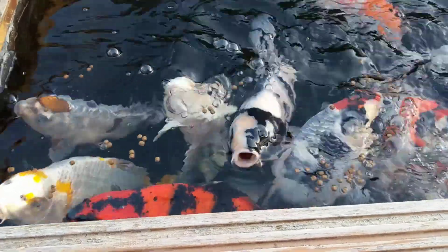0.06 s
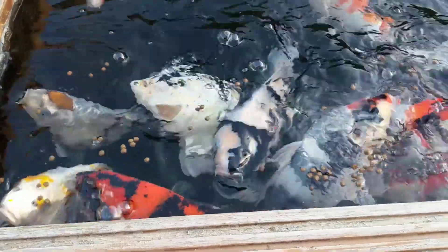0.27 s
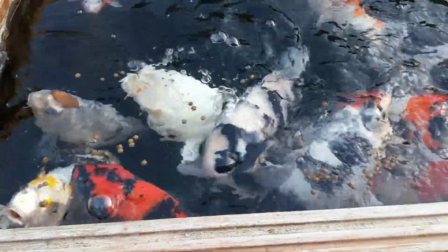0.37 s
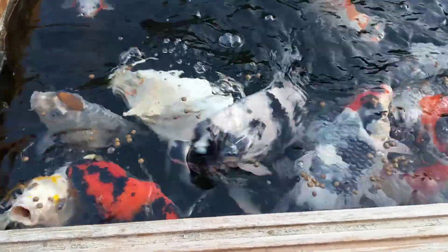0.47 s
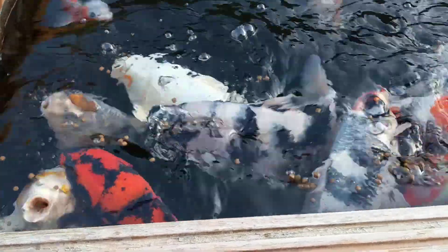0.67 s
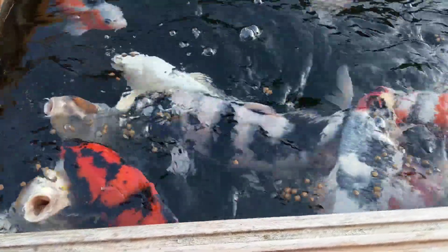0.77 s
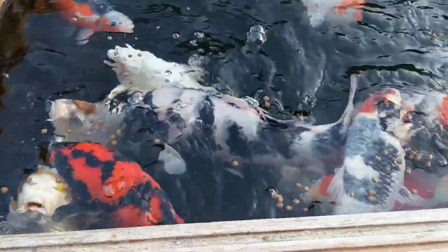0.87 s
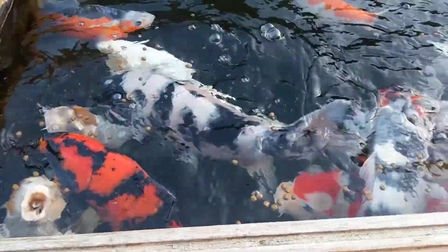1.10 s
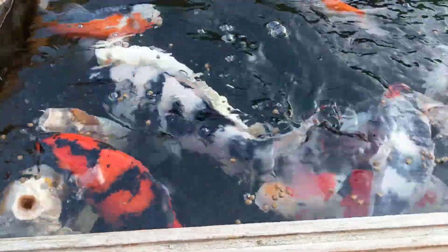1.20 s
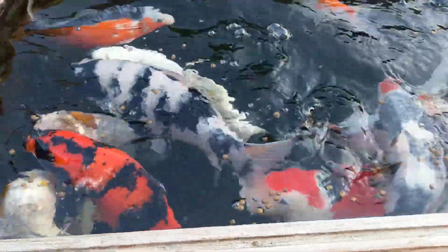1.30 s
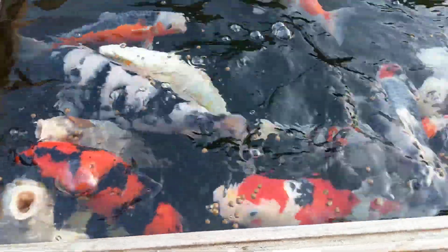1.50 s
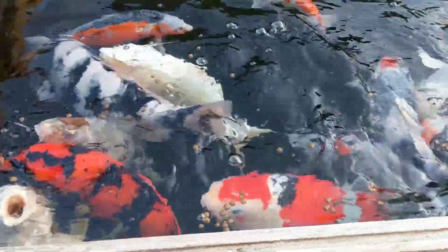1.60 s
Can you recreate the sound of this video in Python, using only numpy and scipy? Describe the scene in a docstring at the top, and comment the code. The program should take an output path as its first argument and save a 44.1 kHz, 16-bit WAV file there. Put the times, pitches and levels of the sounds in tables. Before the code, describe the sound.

Feeding fish gulp and bubble at a pond surface, heard close and dry. Faint plops open; a crisp cluster of pops and ticks comes at 0.2 seconds, then the loudest moment, a very short fluttering slurp at 0.33. Quick rising blips, plops and droplet spatters follow, busiest around 0.55 to 0.8, sparser afterward with pops near 1.1 and 1.3, fading into trickle, quiet hiss and low wavering hum by 1.6.

```python
"""Carp feed at the surface of a pond, close under a small microphone. Each gulped air pocket is a sine
gliding upward; small bubbles plop and droplets tick as damped notes, some droplets in showers.
One mouth slurps in a burst of fluttering puffs. Around them runs a fine random trickle of tiny bubbles,
with short reflections from the bank. Behind lie outdoor hiss and a low wavering hum of filtered noise."""
import sys
import numpy as np
from scipy import signal
from scipy.fft import rfft, irfft
from scipy.io import wavfile

SR = 44100
rng = np.random.default_rng(int(sys.argv[2]) if len(sys.argv) > 2 else 0)


def to_wav(sig):
    """Store sig (one row per channel, or 1-D mono) as 16-bit WAV at the path in sys.argv[1].

    Samples outside -1..1 are clipped; the rate is SR.
    """
    pcm = np.clip(np.atleast_2d(sig), -1, 1) * 32767
    pcm = np.round(pcm).astype(np.int16)
    wavfile.write(sys.argv[1], SR, pcm.T)  # frames by channels


def ratio_of_db(decibels):
    """Turn decibels (scalar or array-like) into linear amplitude factors; 0 dB maps to 1."""
    return 10 ** (np.asarray(decibels, float) / 20)


N = 72765


def evened(x):
    """Scales a sound to an rms of 1."""
    return x / np.sqrt(np.mean(x ** 2) + 1e-20)


def along(points, t):
    """Reads a (time, value) table in straight lines."""
    return np.interp(t, *np.transpose(points))


def read(points, hz):
    """Reads a (pitch, value) table in straight lines over log pitch."""
    f, value = np.transpose(points)
    return np.interp(np.log(hz + 1), np.log(f + 1), value)


def add(mix, start_s, sound):
    """Lays a sound into the mix, cut off where the mix ends."""
    part = mix[max(round(start_s * SR), 0):][:len(sound)]
    part += sound[:len(part)]


def sine(hz):
    """A sine whose pitch follows hz, sample by sample."""
    return np.sin(2 * np.pi * np.cumsum(hz) / SR)


def ring(hz, t60_s, octaves, rise_s):
    """A damped bubble note whose pitch slides and levels off after a third of the octaves; envelope peak 1."""
    t60_s = max(t60_s, .002)
    t = np.arange(0, t60_s * 2.5, 1 / SR)
    envelope = (1 - np.exp(-t / rise_s)) ** 2 * ratio_of_db(-60 * t / t60_s)
    pitch_hz = hz * 2 ** (octaves * np.tanh(3 * t / t60_s) / 3)
    return envelope / envelope.max() * sine(np.minimum(pitch_hz, SR / 2.2))


# Air pockets gulped close to the microphone, the note climbing as they near the surface:
# start_s, length_s, level_db (before fade and waver), first_pitch_hz, last_pitch_hz, bend (of the climb)
GULP_TABLE = [(0.036, 0.046, -55, 860, 2170, 0.62), (0.052, 0.022, -51.5, 594, 900, 1.07),
              (0.089, 0.037, -57.5, 1057, 1235, 0.89), (.238, 0.033, -42, 768, 1334, 1),
              (0.364, 0.019, -49.5, 760, 1210, 0.66), (0.416, 0.046, -47, 623, 1342, 1.03),
              (0.479, 0.025, -52.5, 500, 870, 1.46), (0.517, 0.018, -40.5, 822, 1210, 1.28),
              (0.545, 0.037, -55, 740, 1040, 0.56), (0.615, 0.063, -45.5, 654, 1540, 1.28),
              (0.685, 0.047, -46, 1003, 1950, 1.49), (0.708, 0.038, -45, 700, 1050, 0.78),
              (0.896, 0.04, -54, 797, 2710, 1.1), (1.108, 0.032, -48, 723, 950, 1.14),
              (1.158, 0.046, -54.5, 634, 2425, 1.8), (1.153, 0.0255, -57.5, 1365, 1750, 1.5),
              (1.233, 0.023, -45, 674, 810, 1.2), (1.257, 0.022, -49.5, 825, 1260, .9),
              (1.308, 0.038, -44, 335, 1200, 1.83), (1.353, 0.045, -45.5, 595.6, 1324, 0.87),
              (1.399, 0.03, -57.5, 1220, 2460, 0.76), (1.431, 0.05, -61.5, 498, 1210, 1.34)]
GULP_RISE_S, GULP_END_SHARE = 0.0018, 0.2
GULP_FADE_DB, GULP_WAVER_DB = -13.5, 2.4  # fade over the length; swing of each of two wavers
GULP_DB_PER_OCTAVE = 4.5  # the higher note radiates better


def gulp(length_s, level_db, first_hz, last_hz, bend):
    """A rising air pocket: a clean note gliding upward, fading and wavering a little."""
    t = np.arange(0, length_s, 1 / SR)
    progress = t / length_s
    phase = rng.random(2)
    waver = np.sin(2 * np.pi * (55 * t + phase[0])) + np.sin(2 * np.pi * (130 * t + phase[1]))
    shape = np.minimum(t / GULP_RISE_S, 1) * np.clip((1 - progress) / GULP_END_SHARE, 0, 1)
    hz = first_hz * (last_hz / first_hz) ** (progress ** bend)
    gain_db = level_db + GULP_FADE_DB * progress + GULP_WAVER_DB * waver
    gain_db += GULP_DB_PER_OCTAVE * np.log2(hz / first_hz)
    return shape * ratio_of_db(gain_db) * sine(hz)


# Small bubbles close by, each a quickly damped note:
# start_s, level_db (note peak), pitch_hz, t60_s, climb (first slope, octaves per t60)
PLOP_TABLE = [(.016, -41.5, 1187, 0.025, 0.65), (0.0775, -44, 530, 0.02, 1.5),
              (0.04, -44, 8330, 0.0052, 0.7), (.088, -47, 510, 0.02, -0.5), (0.213, -46, 1124, 0.021, 0.3),
              (0.2325, -27, 1530, 0.0038, 1.96), (.241, -30.5, 400, 0.0073, 0.3),
              (0.274, -47, 1690, 0.029, 0.1), (.295, -37.5, 750, 0.0066, 2.5), (.308, -30, 803, 0.012, 3),
              (.314, -48, 2120, 0.02, 1.4), (0.3203, -39, 1054, 0.04, 1.2), (.38, -49, 3130, 0.011, -0.5),
              (0.3854, -38.5, 3800, 0.007, 1.1), (0.396, -44, 1290, 0.027, 0.62),
              (.4035, -42.5, 1947, 0.06, -0.3), (0.412, -32.5, 1640, 0.013, 1.05),
              (.467, -47.5, 577, 0.023, 4), (0.584, -44.5, 1290, 0.03, 0.9),
              (0.608, -37, 1830, 0.011, -0.2), (0.618, -38.5, 1615, 0.014, 0.8),
              (0.686, -34.5, 1041, 0.039, 0.4), (0.698, -40, 515, 0.017, -0.2),
              (0.7524, -27.5, 1151, .018, 2.5), (0.769, -45, 1326, 0.033, 0.6),
              (0.785, -41, 1680, 0.019, 1.4), (0.821, -42.5, 800, 0.0059, 2), (.956, -49, 556, 0.027, .3),
              (.977, -48.5, 295, 0.022, -1.2), (1.038, -47, 282, 0.062, 0.5),
              (1.064, -39.5, 1494, 0.011, 1.5), (1.068, -51, 865, 0.023, 0),
              (1.0937, -29, 795, 0.0085, 1.6), (1.097, -41.5, 1035, 0.01, 1),
              (1.149, -44.5, 545, 0.026, 1.1), (1.121, -54.5, 3220, .015, -.1),
              (1.2627, -41, 2570, 0.018, 0.45), (1.263, -43.5, 2200, 0.021, .05),
              (1.277, -56.5, 2550, 0.053, 0.5), (1.2713, -42, 2240, 0.009, 0.2),
              (1.32, -55, 1996, 0.031, .1), (1.353, -34.5, 596, 0.054, 2.1), (1.387, -42.5, 427, 0.016, 0),
              (1.486, -49.5, 2200, 0.029, 0), (1.544, -42.5, 623, 0.021, 1.26),
              (1.602, -43, 704, 0.0032, .3)]
PLOP_RISE, PLOP_SNAP_DB = 0.025, -11.5  # rise as a share of t60; push relative to the note


def plop(level_db, hz, t60_s, octaves):
    """A bubble's damped note together with a one-sided push of the surface."""
    note = ring(hz, t60_s, octaves, PLOP_RISE * t60_s)
    u = np.arange(len(note)) / SR * hz * 9
    push = (np.e * u / 2) ** 2 * np.exp(-u)  # peak 1
    return ratio_of_db(level_db) * (note - ratio_of_db(PLOP_SNAP_DB) * push)


# Droplets and pops close by, a few cycles of treble:
# start_s, level_db (ring peak), pitch_hz, t60_s (the ring uses at least 0.002)
TICK_TABLE = [(0.037, -45, 4960, 0.011), (0.2097, -24, 3570, 0.005), (0.2141, -35.5, 4430, 0.0023),
              (0.2322, -34, 4180, 0.0046), (0.494, -52, 8740, 0.0067), (0.5425, -46, 5740, 0.0036),
              (0.5538, -35, 4380, 0.0026), (0.5907, -34.5, 9080, 0.005), (0.5912, -34, 6800, 0.0032),
              (.602, -48, 9300, 0.0029), (0.6185, -43.5, 6040, 0.0066), (0.6631, -47, 7700, 0.0041),
              (0.6845, -41.5, 5800, 0.0019), (0.7327, -47, 4470, 0.012), (0.752, -44.5, 3920, 0.0059),
              (0.7714, -34, 4340, 0.004), (0.7775, -38, 3800, 0.0045), (0.7844, -38, 5700, 0.0012),
              (0.789, -59, 9260, 0.01), (0.8105, -42.5, 9500, 0.00079), (0.893, -51, 9260, 0.0045),
              (0.9045, -36, 9400, 0.0028), (.9047, -49.5, 6340, 0.014), (0.904, -45, 4630, .006),
              (.92, -60, 6440, 0.02), (0.9477, -52, 6500, 0.015), (.9537, -47, 8350, 0.0017),
              (.9625, -52, 8700, 0.0043), (0.968, -50.5, 10200, 0.0036), (1.0012, -52, 6240, 0.0064),
              (1.064, -45.5, 4800, 0.0014), (1.1093, -38, 7050, 0.0012), (1.129, -38.5, 5840, 0.001),
              (1.2936, -36.5, 4650, 0.0033), (1.2942, -45, 3950, 0.023), (1.3255, -50, 4600, 0.015),
              (1.348, -53.5, 8730, 0.0085), (1.467, -48, 4920, 0.013), (1.5108, -37, 4260, 0.0042)]
TICK_RISE = 0.031  # share of t60
SNAP_DB, SNAP_S = -3, 0.00078
SNAP_DB_PER_S = -2500  # the longer a droplet rings, the softer its snap


def tick(level_db, hz, t60_s):
    """A droplet strike: a brief wide noise snap and a few ringing cycles."""
    t = np.arange(1500) / SR
    sound = rng.standard_normal(1500) * np.exp(-t / SNAP_S) * ratio_of_db(SNAP_DB + SNAP_DB_PER_S * t60_s)
    add(sound, 0, ring(hz, t60_s, 0.18, TICK_RISE * t60_s))
    return ratio_of_db(level_db) * sound


# Strength of the slurp's puffs at the lips: time_s, level_db (puff peak)
PUFF_LEVEL = [(.3255, -32), (.3292, -22.5), (.3333, -16.5), (.3355, -22), (.3376, -21), (.340, -31),
              (.344, -41), (.355, -50)]
# Resonance of the narrowing mouth: time_s, pitch_hz
MOUTH_PITCH = [(.325, 1600), (.329, 1750), (.333, 2250), (.338, 2550), (.340, 2000), (.344, 1300),
               (.355, 1900)]
FLUTTER_START_S, FLAPS_PER_S, FLAP_COUNT = .3292, 478, 5
PUFF_S, GURGLES_PER_S = 0.00026, 900
PUFF_CLIMB_PER_S = 190  # the pitch slides up as the lips close, by twice this share per second
SLURP_HISS_DB = -55  # rms at the end of the flutter, lower on either side


def slurp():
    """Fluttering lips: an opening puff, five even ones and a loose gurgle, each a short mouth resonance."""
    out = np.zeros(N)
    first_s, last_s = PUFF_LEVEL[0][0], PUFF_LEVEL[-1][0]
    steady = FLUTTER_START_S + np.arange(FLAP_COUNT) / FLAPS_PER_S
    loose = np.arange(steady[-1] + 0.00204, last_s, 1 / GURGLES_PER_S)
    chance = rng.random((60, 3))
    u = np.arange(-100, 200) / SR
    shape = np.exp(-.5 * (u / (PUFF_S * np.where(u > 0, 1.4, 1))) ** 2)  # falls slower than it rises
    for k, s in enumerate([first_s, *steady, *loose]):
        slack, turn, detune = chance[k]
        free = k > FLAP_COUNT  # only the gurgle strays in time and pitch
        hz = along(MOUTH_PITCH, s) * 2 ** (0.33 * free * (detune - .5))
        cycles = hz * u * (1 + PUFF_CLIMB_PER_S * u) + turn
        puff = ratio_of_db(along(PUFF_LEVEL, s)) * shape * np.cos(2 * np.pi * cycles)
        add(out, s + u[0] + free * slack / GURGLES_PER_S, puff)
    band = signal.butter(2, [4000, 11000], "band", fs=SR, output="sos")
    hiss = evened(signal.sosfilt(band, rng.standard_normal(N)))
    swell = np.interp(np.arange(N) / SR, [first_s, steady[-1], last_s], [.2, 1, .4], 0, 0)
    return out + hiss * swell * ratio_of_db(SLURP_HISS_DB)


# Showers of droplets on the surface: start_s, length_s, level_db (rms), middle_pitch_hz
SPRAY_TABLE = [(0.229, 0.011, -71, 3320), (0.608, 0.028, -52.5, 7000), (0.953, 0.035, -62, 4970),
               (1.091, 0.05, -64.5, 2720), (1.475, 0.034, -66.5, 2630)]
SPRAY_DROPS_PER_S = 4500


def spray(length_s, level_db, middle_hz):
    """A shower of droplets, each a few cycles at its own pitch, thinning out and weakening."""
    out = np.zeros(round(length_s * SR) + 900)
    for when, pitch, size in rng.random((200, 3))[:round(length_s * SPRAY_DROPS_PER_S)]:
        hz = middle_hz * 2 ** (2.1 * (pitch - .5))
        gain = min(when / 0.068, 1) * ratio_of_db(-18 * size - 12.0 * when)
        add(out, length_s * when ** 1.2, gain * ring(hz, 16 / hz, 0.68, 0.14 / hz))
    return ratio_of_db(level_db) * evened(out)


# How stirred the water is: time_s, level_db
STIR_LEVEL = [(0, -64.5), (.19, -66.5), (.24, -52), (.3, -69.5), (.35, -53.5), (.44, -66), (.5, -66.5),
              (.55, -57.5), (.6, -58), (.65, -60), (.79, -60), (.84, -64.5), (.95, -65.5), (1.03, -66.5),
              (1.12, -63), (1.22, -66.5), (1.3, -61.5), (1.41, -70), (1.49, -62.5), (1.56, -71),
              (1.65, -67.5)]
# Grain size by pitch, relative: pitch_hz, level_db
TRICKLE_COLOUR = [(300, -4), (700, -3.5), (1500, 1.5), (3000, -3), (5000, 3), (7500, -6), (9300, -4),
                  (12000, -15)]
TRICKLE_DB = 0.5  # added to the stir level
GRAINS_PER_S, GRAIN_PITCHES = 3600, 36  # the rate is shared among the pitches
GRAIN_SPREAD_DB, GRAIN_CYCLES = 4.5, 12.6


def trickle():
    """Many tiny ringing bubbles at random, louder while the water is stirred."""
    out = np.zeros(N)
    for hz in np.geomspace(300, 12000, num=GRAIN_PITCHES):
        starts = rng.random(N) < GRAINS_PER_S / GRAIN_PITCHES / SR
        size = np.minimum(rng.exponential(1, N), 4)
        train = starts * ratio_of_db(GRAIN_SPREAD_DB * size)
        vary = rng.random(2)
        grain = ring(hz, 4.6 * GRAIN_CYCLES * (.5 + vary[0]) / hz, .5 * vary[1], 0.22 / hz)
        gain = ratio_of_db(read(TRICKLE_COLOUR, hz)) * np.sqrt(hz / 1000)
        out += gain * signal.oaconvolve(train, grain)[:N]
    return evened(out) * ratio_of_db(TRICKLE_DB + along(STIR_LEVEL, np.arange(N) / SR))


BANK_T60_S, BANK_DB = 0.039, -16.5


def with_bank(near):
    """Adds short reflections from the pond wall and the boards, as decaying noise after 2 ms."""
    t = np.arange(8000) / SR
    bank = rng.standard_normal(8000) * ratio_of_db(-60 * t / BANK_T60_S) * (t > .002)
    return near + ratio_of_db(BANK_DB) * signal.oaconvolve(near, bank / np.linalg.norm(bank))[:N]


# The small microphone's colour on near sounds: pitch_hz, level_db
MIC_COLOUR = [(100, 0.8), (3000, -0.45), (5600, -3.5), (6400, 1), (7800, -3), (9300, 3.5), (10800, -5.5),
              (12500, -13.5), (16000, -21)]


def microphone(near):
    """Filters the near sounds by the microphone's response."""
    return irfft(rfft(near) * ratio_of_db(read(MIC_COLOUR, np.fft.rfftfreq(N, 1 / SR))), N)


# Spectrum of the background hiss as stored, relative, with a steep cutoff near 16 kHz:
# pitch_hz, level_db (per Hz)
AIR_COLOUR = [(24, -43), (40, 3.5), (75, 3.5), (165, -4), (382, -8), (573, -11), (1170, -12), (1320, -21.5),
              (1890, -18), (3380, -25.5), (4820, -25.5), (7240, -30.5), (9320, -28.5), (11400, -32.5),
              (15700, -34), (16000, -60)]
AIR_DB = -62  # rms
# Low hums in the background: pitch_hz, width_hz (between half-amplitude points), level_db (rms)
HUM_TABLE = [(44.7, 17, -67.5), (86, 46, -65)]


def filtered_noise(gain):
    """Steady noise shaped by a gain for each frequency, rms 1."""
    return evened(irfft(rfft(rng.standard_normal(N)) * gain, N))


def air():
    """Steady outdoor hiss and two narrow noise bands heard as low wavering hums."""
    hz = np.fft.rfftfreq(N, 1 / SR)
    out = ratio_of_db(AIR_DB) * filtered_noise(ratio_of_db(read(AIR_COLOUR, hz)))
    for centre_hz, width_hz, level_db in HUM_TABLE:
        out += ratio_of_db(level_db) * filtered_noise(1 / (1 + (2 * (hz - centre_hz) / width_hz) ** 4))
    return out


def scene():
    """All water sounds with bank reflections and microphone colour, over the outdoor air."""
    water = slurp() + trickle()
    sources = [(gulp, GULP_TABLE), (plop, PLOP_TABLE), (tick, TICK_TABLE), (spray, SPRAY_TABLE)]
    for source, table in sources:
        for start_s, *settings in table:
            add(water, start_s, source(*settings))
    return (microphone(with_bank(water)) + air())[None]


def low_pass(x):
    """Removes everything above the highest recorded frequency."""
    return signal.sosfilt(signal.butter(12, 16440, fs=SR, output="sos"), x)


def record(dry):
    """Takes the finished mix to its stored form."""
    return low_pass(dry)


dry = scene()
out = record(dry)
to_wav(out)
```